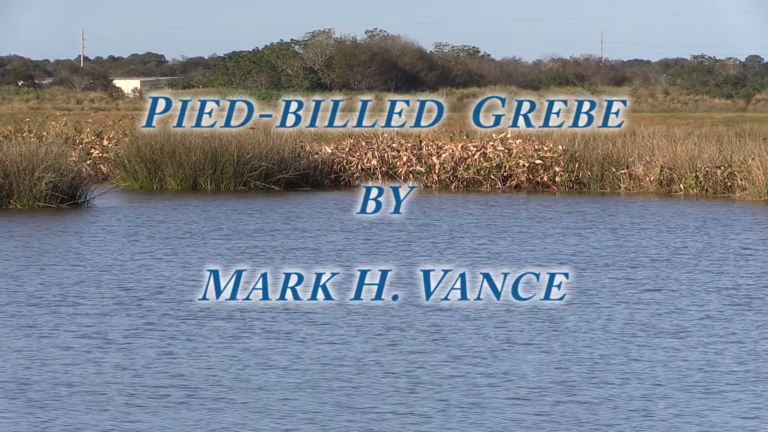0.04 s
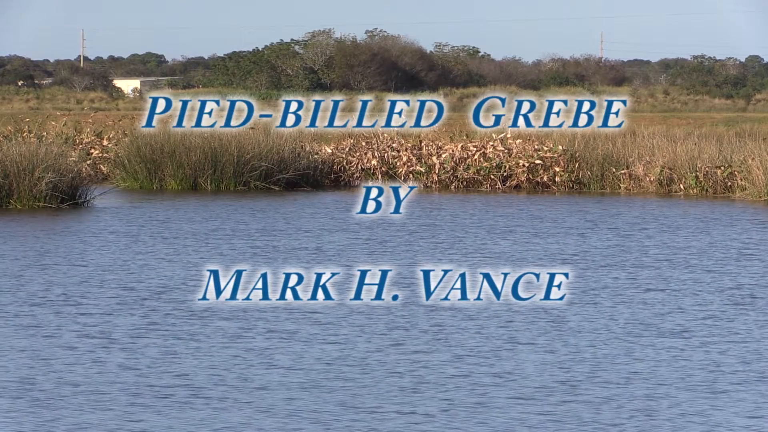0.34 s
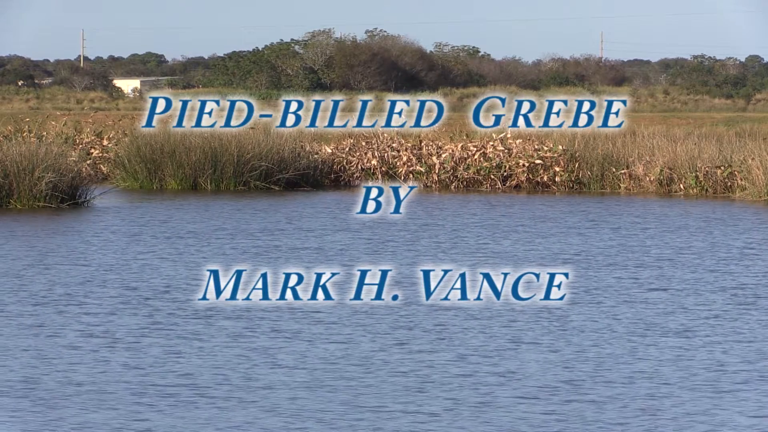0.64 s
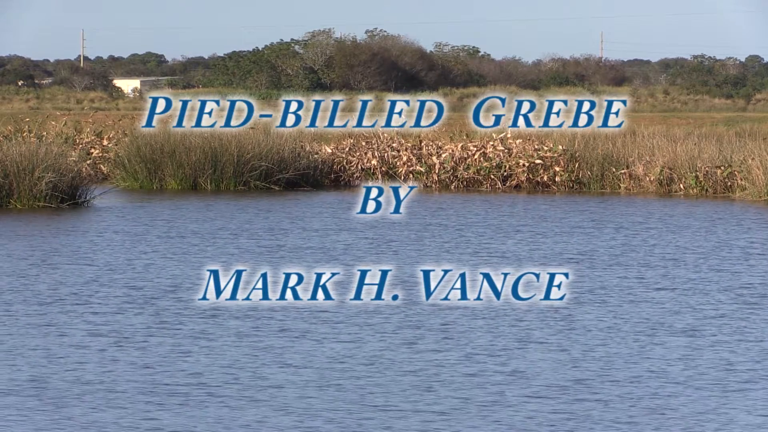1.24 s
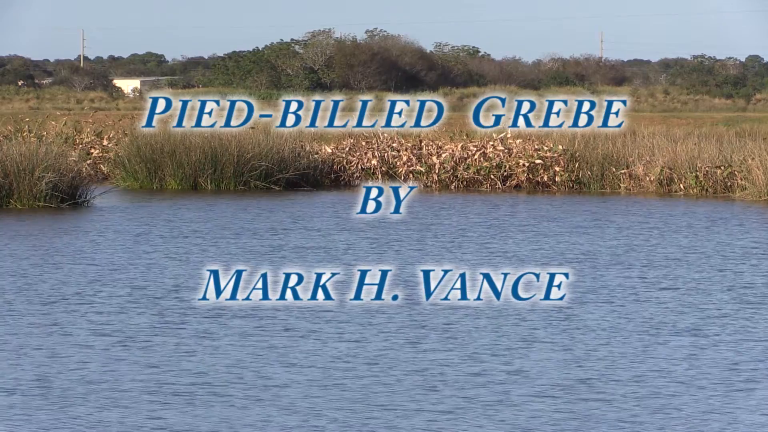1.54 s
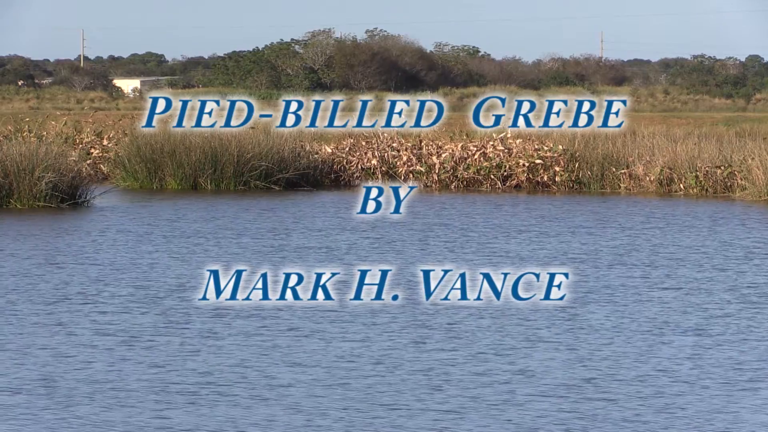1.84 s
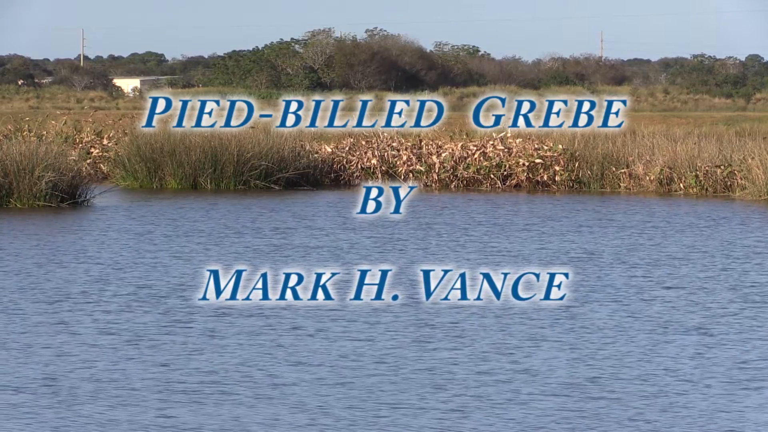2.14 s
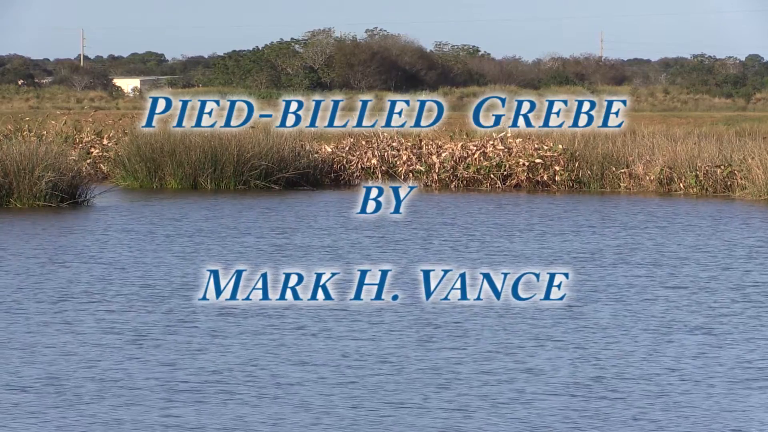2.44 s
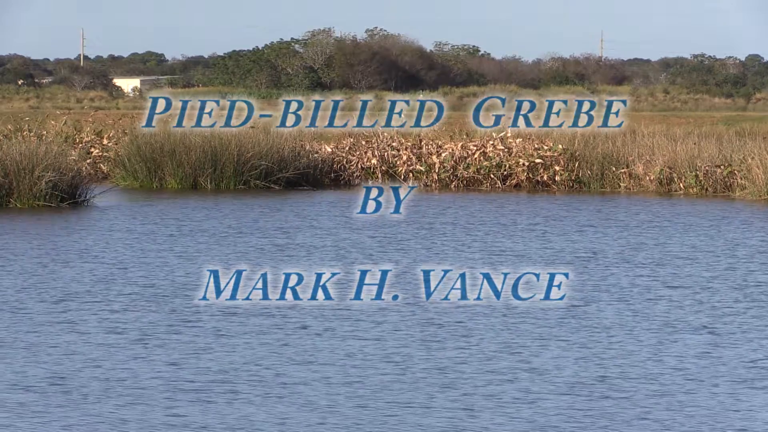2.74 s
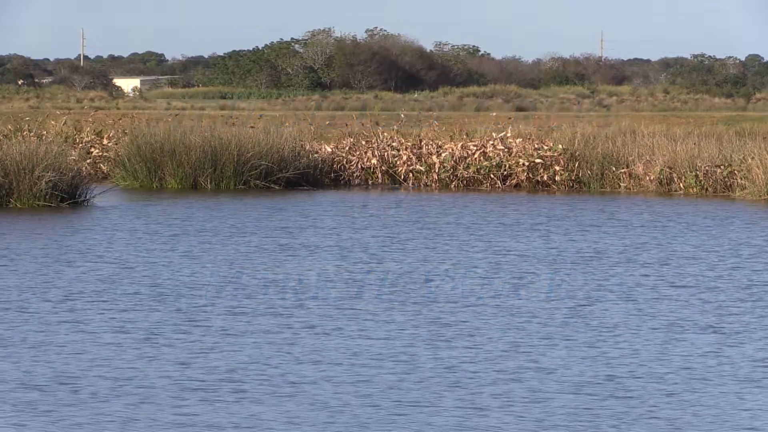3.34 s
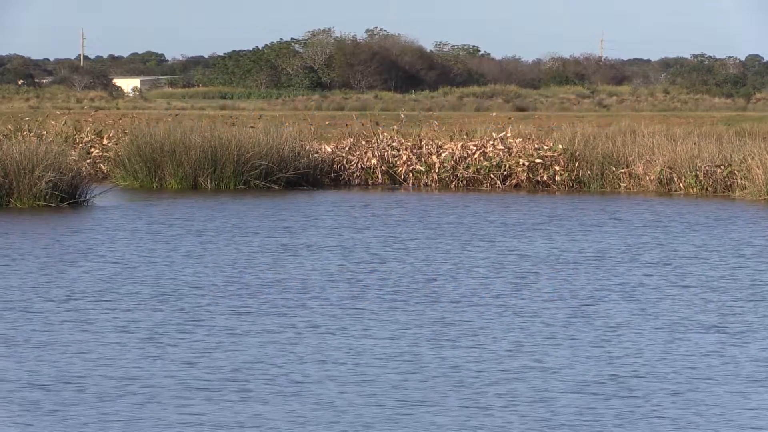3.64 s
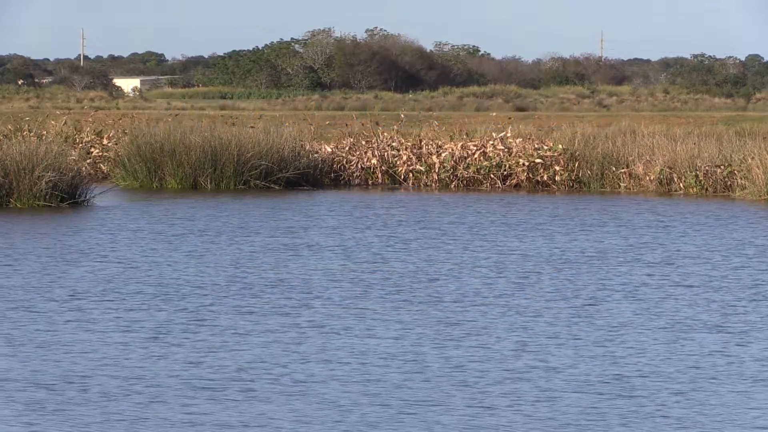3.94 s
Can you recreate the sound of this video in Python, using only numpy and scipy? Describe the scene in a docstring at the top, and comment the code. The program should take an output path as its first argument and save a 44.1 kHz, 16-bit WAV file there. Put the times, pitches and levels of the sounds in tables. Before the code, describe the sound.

Wind rumbles over a marsh, then a water bird calls in rapid, raspy nasal notes.

```python
"""A grebe starts a quick run of nasal notes across a pond, each breaking into a rasp as its pitch sags.
Its voice is a buzz of harmonics shaped by the throat, with soft hoarse notes between the loud ones.
From the start, wind buffets the microphone over a marsh wash of ripples and reeds, all shaped noise.
Small birds scold, whistle and chip far off in husky puffs and gliding tones; a few ticks and drips
snap close by. The banks scatter a faint echo, and the camera adds a thin whine."""
import sys
import numpy as np
from scipy import signal
from scipy.fft import rfft, irfft
from scipy.io import wavfile
from scipy.ndimage import uniform_filter1d

SR = 44100
rng = np.random.default_rng(int(sys.argv[2]) if len(sys.argv) > 2 else 0)


def file_out(sig):
    """Save sig as 16-bit WAV at sys.argv[1]."""
    # one column per channel
    cols = np.atleast_2d(sig).T
    # limit, then scale
    lim = np.clip(cols, -1, 1)
    pcm = np.round(lim * 32767).astype(np.int16)
    wavfile.write(sys.argv[1], SR, pcm)


N = 176400

# The rise and fall of the wind. Each row: time in seconds, gust strength in dB.
GUSTS = [(0, -24.5), (.12, -20), (.48, -21), (.56, -21.5), (.84, -31), (0.919, -16.5), (1.05, -12),
         (1.15, -24), (1.279, -16), (1.42, -26), (1.78, -23.5), (1.9, -13), (2.32, -16.5), (2.42, -22),
         (2.6, -23.5), (2.68, -17), (2.841, -11), (3.0, -29.5), (3.3, -29.5), (3.44, -19), (3.8, -26.5),
         (3.95, -20.5), (3.99, -10)]
# EQ curves of the wind's deep rumble and the flutter above it. Each row: frequency in Hz, gain in dB.
RUMBLE_EQ = [(5, -11.5), (15, 6), (27, 1.5), (40, -6.5), (60, -18.5), (90, -35), (160, -40), (400, -94.5)]
FLUTTER_EQ = [(30, -15.5), (80, 1.5), (110, -6.5), (160, -14.5), (250, -23.5), (500, -34.5), (1500, -66.5)]
# Tone of the marsh wash. Each row: frequency in Hz, gain in dB.
WASH_EQ = [(150, -4), (250, -8.5), (353, -8), (427, -9), (507, -7), (583, -6), (705, -4), (837, -5),
           (1010, -8), (1100, -9.5), (1640, -14), (3010, -23.5), (4790, -27.5), (15500, -35)]
# Stereo width of the wash. Each row: frequency in Hz, left-right likeness from 0 to 1.
WASH_LIKENESS = [(200, .2), (600, 0.017), (1200, 0.13), (2500, 0.15), (5000, 0.033), (12000, 0.033)]
# Stereo lean of the wash. Each row: frequency in Hz, left over right in dB.
WASH_PAN = [(200, -5), (700, -3.5), (1400, -5), (3000, 1.5), (8000, 0.5), (14000, 0)]
# Far scolding notes. Each row: centre time in seconds, level in dB.
SCOLDS = [(.175, -60), (0.234, -64.5), (1.54, -60), (1.602, -58), (1.66, -57), (1.725, -56), (1.785, -54.5),
          (2.959, -57), (3.03, -63)]
# Far whistles. Each row: start and length in seconds, level in dB, first pitch, last pitch and
# mid-note bend in Hz, left over right in dB.
WHISTLES = [(0.416, 0.068, -69, 3100, 2350, 0, 19), (.915, .05, -75, 7950, 7740, -50, -14),
            (1.148, .215, -66, 3610, 3205, 116, 18.5), (1.355, 0.039, -61, 2750, 2460, -38, 23),
            (1.675, 0.024, -61, 2800, 2220, 50, 23), (1.992, 0.028, -67, 3100, 2920, 30, 10),
            (2.017, 0.0276, -62.5, 2730, 2470, -20, 21), (2.698, 0.046, -69, 3450, 4370, -2, 20),
            (3.901, 0.068, -62, 3540, 3410, -19, 19), (3.978, 0.036, -61, 3440, 3360, -8, -6)]
# Ticks, drips and a soft plop. Each row: start in seconds, level in dB, band centre in Hz,
# band width in octaves, decay time in seconds.
TICKS = [(0.54, -42, 4850, 0.46, 0.0018), (0.664, -44, 2700, 0.49, 0.0034),
         (0.6694, -42.5, 3580, 0.5, .003), (.6735, -34, 1790, 0.15, 0.0035),
         (.682, -46, 1900, 0.72, 0.0034), (.709, -52, 5800, .2, .002), (.756, -51.5, 5130, 0.062, 0.0022),
         (0.871, -46.5, 1540, 0.097, 0.0093), (.7835, -45, 2590, 0.1, 0.0057),
         (.782, -53, 5200, .4, 0.0025), (.823, -46, 4800, 0.081, 0.0014), (0.87, -43.5, 4540, 0.36, 0.0013),
         (1.171, -43.5, 450, 0.95, 0.019), (2.484, -51.5, 4400, 0.43, .003),
         (3.966, -48.5, 5600, .1, 0.0027)]
# A small bird's chips. Each row: start and length in seconds, the lower voice's level in dB and
# top pitch in Hz, relative overtone level in dB.
CHIPS = [(1.421, 0.0225, -46.5, 2560, -25), (3.696, 0.0279, -39, 2644, -13)]
# The grebe's loud notes. Each row: start and length in seconds, level in dB, top pitch in Hz, share of
# the note before it breaks, relative rasp level in dB, treble tilt in dB per octave.
GREBE_NOTES = [(3.089, 0.056, -47, 588, 0.75, 0, -2.5), (3.231, 0.055, -43.5, 608.4, 0.82, -0.5, -0.5),
               (3.365, 0.057, -41, 630, 0.74, -5, 1.7), (3.49, 0.058, -41, 640, 0.71, -5, 0.5),
               (3.617, 0.0565, -41, 652, 0.8, -2, 2), (3.746, 0.053, -43, 656.6, 0.82, -3, -1.5),
               (3.874, 0.058, -43, 652, 0.72, -3.5, -1)]
# The grebe's soft notes. Each row: start in seconds, level in dB.
SOFT_NOTES = [(3.18, -61), (3.309, -59), (3.441, -53), (3.571, -50.5), (3.826, -51), (3.954, -48)]
# The grebe's throat when clear, rasping and soft. Each row: frequency in Hz, gain in dB.
CLEAR_THROAT = [(300, -20), (620, 0), (1150, 4.5), (1450, -3), (1900, 0), (2170, -8), (2500, -1), (3050, 3),
                (3800, -2), (4450, -8), (5700, -16), (7000, -33), (10000, -50)]
RASP_THROAT = [(300, -20), (600, -5), (1150, -3), (1800, -6), (2150, -9), (2650, -1), (3250, 4), (3900, -4),
               (4600, -16), (6000, -23), (7000, -36), (10000, -50)]
SOFT_THROAT = [(400, -12), (700, -4), (1300, 14), (1700, 4), (2350, 10), (3100, 7), (3700, -24),
               (8000, -38)]
# The tones in the camera's whine. Each row: frequency in Hz, level in dB.
WHINE_TONES = [(4000, -79.5), (6000, -82), (8000, -87), (10000, -85)]


def amp(db):
    """Decibels as a gain."""
    return 10 ** (np.asarray(db) / 20)


def unit_rms(x):
    """Normalises to an RMS of one."""
    return x / np.sqrt(np.mean(x ** 2) + 1e-20)


def curve_at(points, hz):
    """Reads a curve whose points are joined by straight lines on a log frequency axis."""
    point_hz, value = np.transpose(points)
    return np.interp(np.log(hz + 1), np.log(point_hz + 1), value)


def equalise(x, curve):
    """Runs x through an EQ curve and normalises it."""
    gain = amp(curve_at(curve, np.fft.rfftfreq(x.shape[-1], 1 / SR)))
    return unit_rms(irfft(rfft(x) * gain, x.shape[-1]))


def noise_band(n, hz, octaves):
    """Noise in one bell-shaped band."""
    away = np.log2((np.fft.rfftfreq(n, 1 / SR) + 1) / hz) / octaves
    return unit_rms(irfft(rfft(rng.standard_normal(n)) / (1 + away ** 4 / 2), n))


def wobble(n, size):
    """A random modulator of unit level, smoothed over `size` steps."""
    return unit_rms(uniform_filter1d(rng.standard_normal(n), size))


def phase_of(hz):
    """Running phase of a pitch curve."""
    return 2 * np.pi * np.cumsum(hz) / SR


def buzz(hz, harmonics=13):
    """A pulse train of equal harmonics on a pitch curve."""
    phase = phase_of(hz)
    return unit_rms(sum(np.cos(k * phase) for k in range(1, harmonics + 1)))


def pan(db):
    """Stereo gains that put the left `db` above the right."""
    return amp(np.array([[db], [-db]]) / 2)


def add(mix, start_s, sound):
    """Lays a sound into the mix."""
    part = mix[:, max(round(start_s * SR), 0):][:, :sound.shape[-1]]
    part += sound[..., :part.shape[1]]


def wind(flutter_growth=0.75):
    """Gusts buffet each microphone port separately: a deep rumble and a lumpy flutter above it."""
    gust_db = np.interp(np.arange(N) / SR, *np.transpose(GUSTS))
    rumble = equalise(rng.standard_normal((2, N)), RUMBLE_EQ) * amp(gust_db + 1.5)
    lumps = unit_rms(amp(1.5 * wobble(N, size=2000)))
    flutter = equalise(rng.standard_normal((2, N)), FLUTTER_EQ) * amp(flutter_growth * gust_db - 23.5)
    return (rumble + lumps * flutter) * pan(db=-3.4)


def marsh_wash(level_db=-45.5, patch_db=0.97, swell_db=0.35):
    """Ripples, reeds and distance blur into a wide bed of noise with drifting patches."""
    frames, hz = N // 256 + 5, np.fft.rfftfreq(1024, 1 / SR)
    left_re, left_im, apart_re, apart_im, patches = rng.standard_normal((5, frames, len(hz)))
    patches = uniform_filter1d(patches, size=12, axis=0)  # smooth in time, then in frequency
    patches = unit_rms(uniform_filter1d(patches, size=14, axis=1))
    likeness, lean = curve_at(WASH_LIKENESS, hz), amp(curve_at(WASH_PAN, hz) / 2)
    left = left_re + 1j * left_im
    right = likeness * left + np.sqrt(1 - likeness ** 2) * (apart_re + 1j * apart_im)
    gain_db = curve_at(WASH_EQ, hz) + patch_db * patches + swell_db * wobble(frames, size=40)[:, None]
    spectra = np.array([left * lean, right / lean]) * amp(gain_db)
    _, bed = signal.istft(spectra.transpose(0, 2, 1), nperseg=1024, noverlap=768)
    return amp(level_db) * unit_rms(bed[:, :N])


def bird_scolds(width_s=0.009):
    """A far bird scolds in short, husky puffs of noise."""
    out, t = np.zeros((2, N)), np.arange(-1024, 1024) / SR
    puff = np.exp(-(t / width_s) ** 2 / 2)
    for centre, db in SCOLDS:
        add(out, centre + t[0], amp(db) * puff * noise_band(len(t), hz=2960, octaves=0.32))
    return out


def bird_whistles(waver=0.014, flicker_db=2.5):
    """Thin far whistles: each a gliding sine that wavers in pitch and flickers in level."""
    out = np.zeros((2, N))
    for start, length, db, first_hz, last_hz, bend_hz, pan_db in WHISTLES:
        u = np.linspace(0, 1, int(length * SR))
        glide_hz = first_hz + (last_hz - first_hz) * u + bend_hz * np.sin(np.pi * u)
        hz = glide_hz * (1 + waver * wobble(len(u), size=100))
        swell = np.sqrt(u * (1 - u)) * amp(flicker_db * wobble(len(u), size=300))
        add(out, start, pan(pan_db) * amp(db) * unit_rms(swell * np.sin(phase_of(hz))))
    return out


def ticks_and_drips(attack_s=0.00024):
    """Close snaps and drips, each dying away in its own band of noise."""
    out, t = np.zeros((2, N)), np.arange(2048) / SR
    for start, db, hz, octaves, decay_s in TICKS:
        envelope = (1 - np.exp(-t / attack_s)) * np.exp(-t / decay_s)
        snap = unit_rms(envelope * noise_band(len(t), hz, octaves)) * np.sqrt(np.mean(envelope ** 2))
        add(out, start, amp(db) * snap)
    return out * pan(db=-3)


def bird_chips(arch=0.27, jitter=0.032, upper_ratio=1.22, upper_db=-7, upper_lead_s=0.004):
    """A small bird chips with two husky voices that arch in pitch, the upper one just ahead."""
    out = np.zeros((2, N))
    for start, length, db, top_hz, overtone_db in CHIPS:
        u = np.linspace(0, 1, int(length * SR))
        for ratio, voice_db, lead_s in [(1, 0, 0), (upper_ratio, upper_db, upper_lead_s)]:
            hz = top_hz * ratio * (1 - arch * (2 * u - 1) ** 2 + jitter * wobble(len(u), size=20))
            phase = phase_of(hz)
            fizz = 0.85 * noise_band(len(u), hz=5800, octaves=0.22)
            overtones = np.sin(2 * phase) + 0.39 * np.sin(3 * phase) + fizz
            husk = 0.47 * noise_band(len(u), hz=2200, octaves=0.36)
            voice = unit_rms(np.sin(phase) + amp(overtone_db) * overtones + husk)
            add(out, start - lead_s, amp(db + voice_db) * np.sin(np.pi * u) * voice)
    return out * pan(db=-6.5)


def grebe_tone(hz, tilt_db, dull_db_per_octave, dull_above_hz=3300, jitter=0.0039):
    """The clear nasal voice: harmonics coloured by the throat, which delays the upper ones."""
    phase = phase_of(hz * (1 + jitter * wobble(len(hz), size=60)))
    tone, dispersion_rad = 0, 0.314
    for k in range(1, 15):
        treble_cut_db = dull_db_per_octave * np.log2(np.maximum(k * hz / dull_above_hz, 1))
        level_db = curve_at(CLEAR_THROAT, k * hz) + tilt_db * np.log2(k) - treble_cut_db
        tone += amp(level_db) * np.cos(k * phase - dispersion_rad * k * k)
    return unit_rms(tone)


def grebe_rasp(hz, jitter=0.13, noise=0.7):
    """The broken voice: uneven pulses, made strong and weak in turn by a buzz an octave down."""
    uneven_hz = hz * (1 + jitter * wobble(len(hz), size=60))
    pulses = buzz(uneven_hz) + buzz(uneven_hz / 2, harmonics=27)
    return equalise(pulses + noise * rng.standard_normal(len(hz)), RASP_THROAT)


def grebe_loud_note(length, db, top_hz, clear_share, rasp_db, tilt_db):
    """A clear nasal tone brightens, sags in pitch and breaks into a rasp."""
    attack_s, release_s, break_s = 0.016, 0.0061, 0.0102
    top_s, round_s, sag_per_s = 0.0129, 0.00887, 6.0
    t = np.arange(0, length, 1 / SR)
    sag = sag_per_s * (np.hypot(t - top_s, round_s) - round_s)  # rounds over the top, then sinks
    hz = top_hz * (1 - sag)
    effort, release = np.minimum(t / attack_s, 1), np.minimum((length - t) / release_s, 1)
    # The treble fades when effort is low or the pitch has sagged.
    tone = grebe_tone(hz, tilt_db, dull_db_per_octave=11 * (1 - effort + 7 * sag))
    rasp = grebe_rasp(hz)
    clear = tone + 0.13 * rasp  # a little rasp runs through the clear part too
    crossfade = np.clip((t - clear_share * length) / break_s + 0.5, 0, 1)
    voice = np.sqrt(1 - crossfade) * clear + np.sqrt(crossfade) * amp(rasp_db) * rasp
    return amp(db) * effort * release * voice


def grebe_soft_note(db, length_s=0.0348, first_hz=700, sag=0.181, jitter=0.08, noise=0.88):
    """A short hoarse note: a falling buzz and noise through the throat."""
    u = np.linspace(0, 1, int(length_s * SR))
    hz = first_hz * (1 - sag * u + jitter * wobble(len(u), size=60))
    hoarse = buzz(hz) + noise * rng.standard_normal(len(u))
    return amp(db) * np.sin(np.pi * u) * equalise(hoarse, SOFT_THROAT)


def grebe(left_lead_s=0.00004):
    """Loud notes alternate with soft hoarse ones, panned to the right."""
    out = np.zeros((2, N))
    for start, *note in GREBE_NOTES:
        add(out, start, grebe_loud_note(*note))
    for start, db in SOFT_NOTES:
        add(out, start, grebe_soft_note(db))
    advance = np.exp(2j * np.pi * np.fft.rfftfreq(N, 1 / SR) * left_lead_s)
    out[0] = irfft(rfft(out[0]) * advance, N)
    return out * pan(db=-6.5)


def bank_echo(x, level_db=-14, t60_s=0.28):
    """Reeds and banks scatter back a faint, short reverb."""
    t = np.arange(SR // 2) / SR
    tail = rng.standard_normal((2, len(t))) * amp(-60 * t / t60_s)
    return amp(level_db) * signal.fftconvolve(x, tail / np.linalg.norm(tail[0]), axes=1)[:, :N]


def scene():
    """Calls and drips with their echo, over the bed of wind and marsh."""
    spots = grebe() + bird_whistles() + bird_chips() + bird_scolds() + ticks_and_drips()
    return spots + bank_echo(spots) + wind() + marsh_wash()


def record(dry, cutoff_hz=15720):
    """The camera adds its faint steady whine; a steep low-pass trims the top."""
    t = np.arange(N) / SR
    whine = sum(amp(db) * unit_rms(np.sin(2 * np.pi * hz * t)) for hz, db in WHINE_TONES)
    lowpass = signal.firwin(511, cutoff_hz, window=("kaiser", 9), fs=SR)
    padded = np.pad(dry + whine, ((0, 0), (255, 255)), mode="reflect", reflect_type="odd")
    return signal.oaconvolve(padded, lowpass[None], "valid")


dry = scene()
out = record(dry)
file_out(out)
```